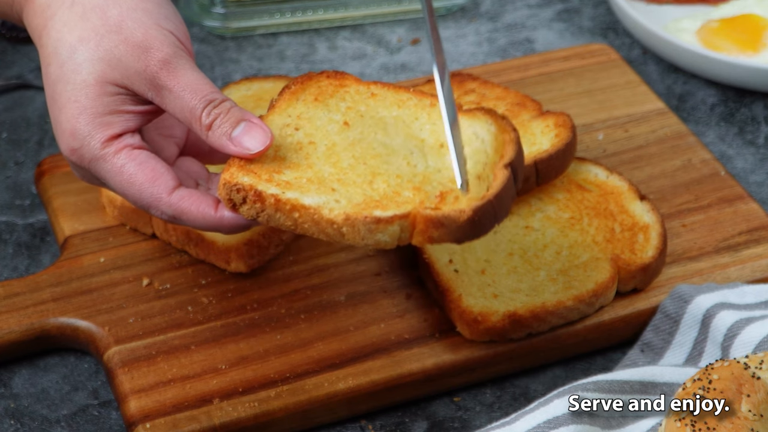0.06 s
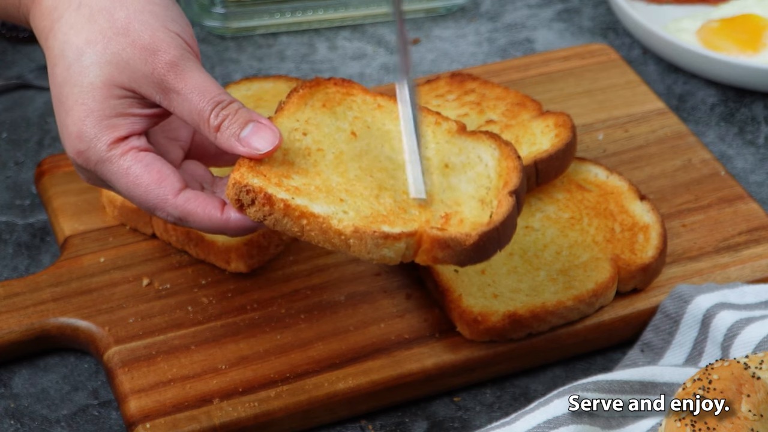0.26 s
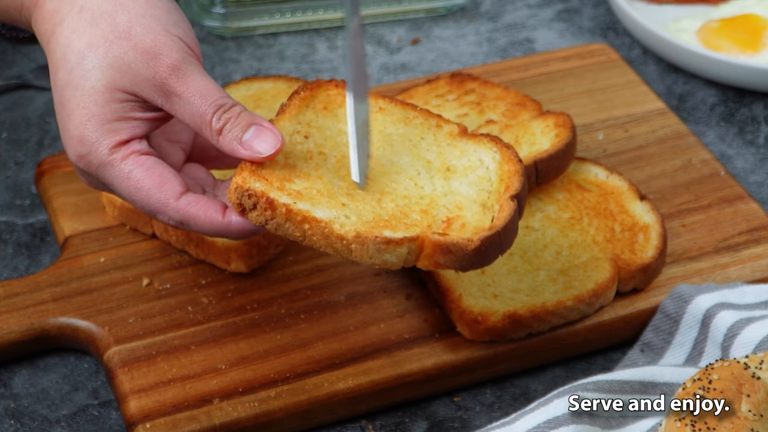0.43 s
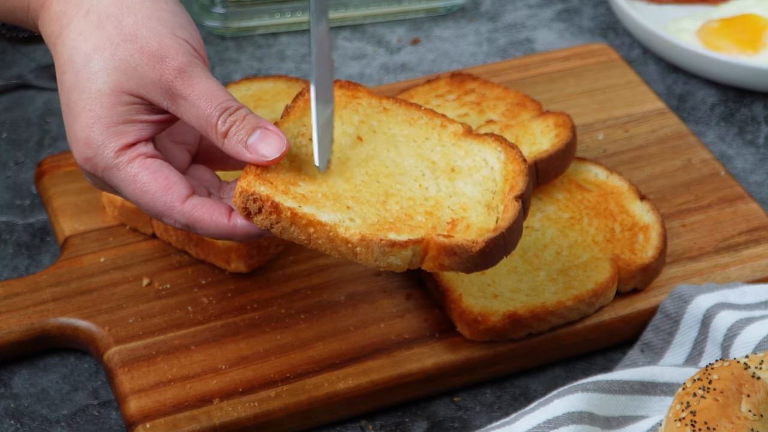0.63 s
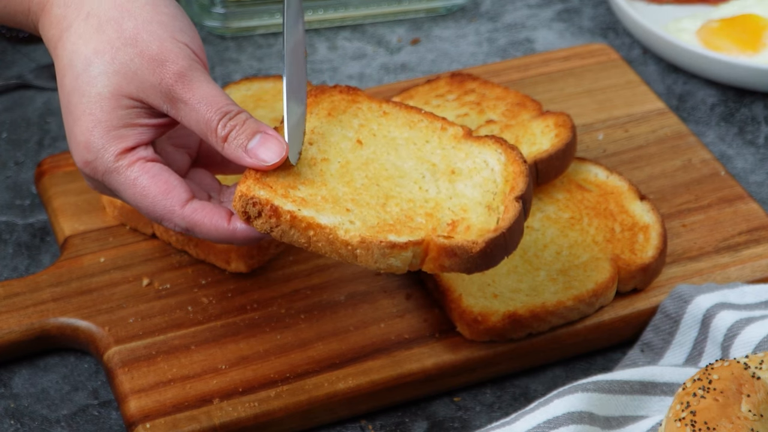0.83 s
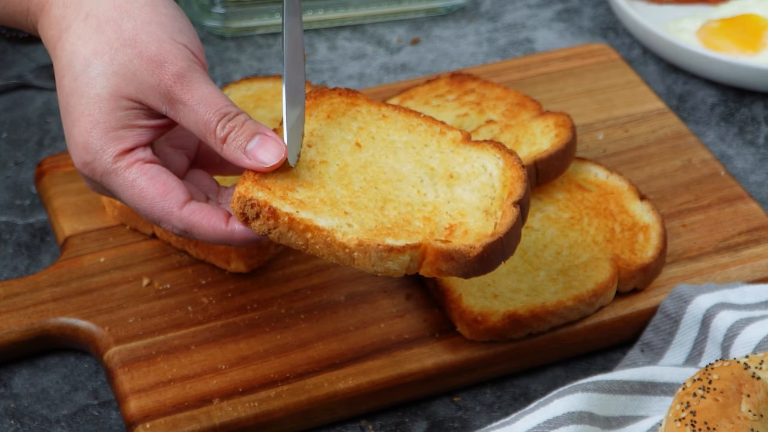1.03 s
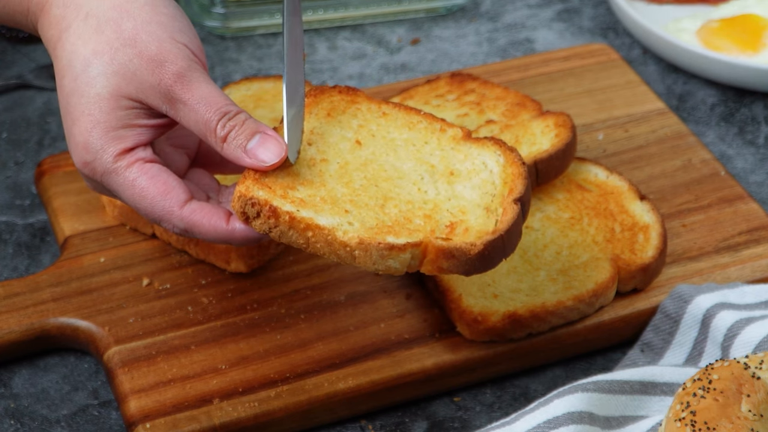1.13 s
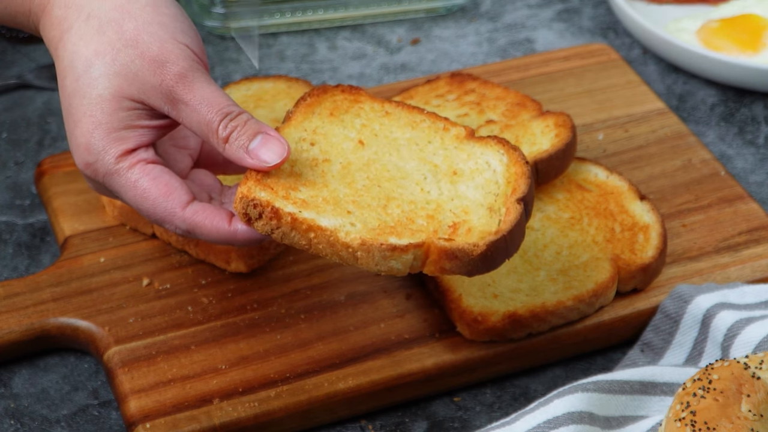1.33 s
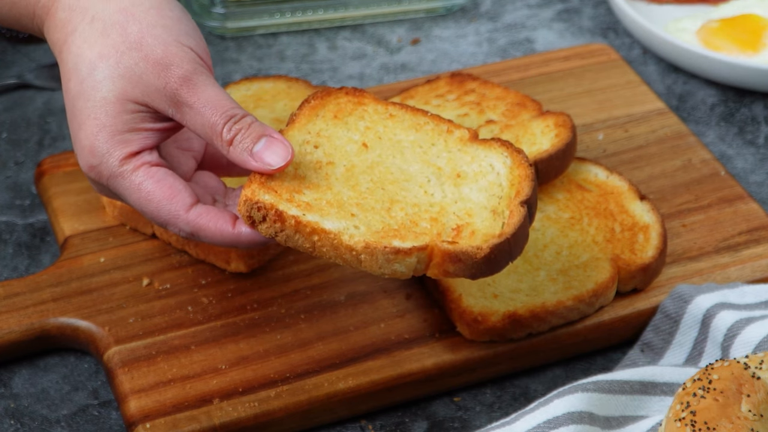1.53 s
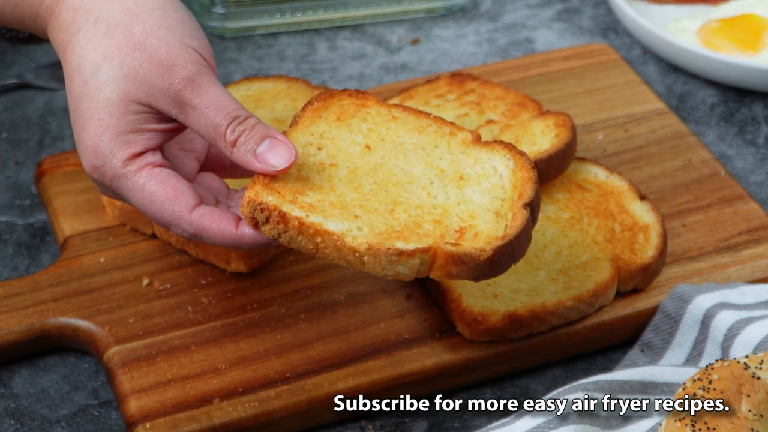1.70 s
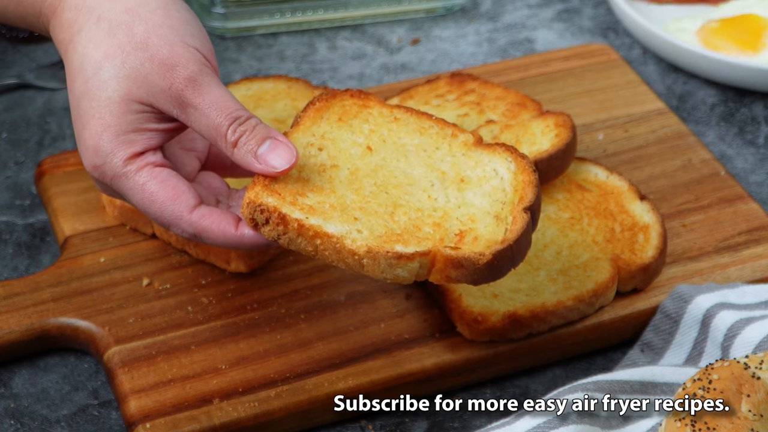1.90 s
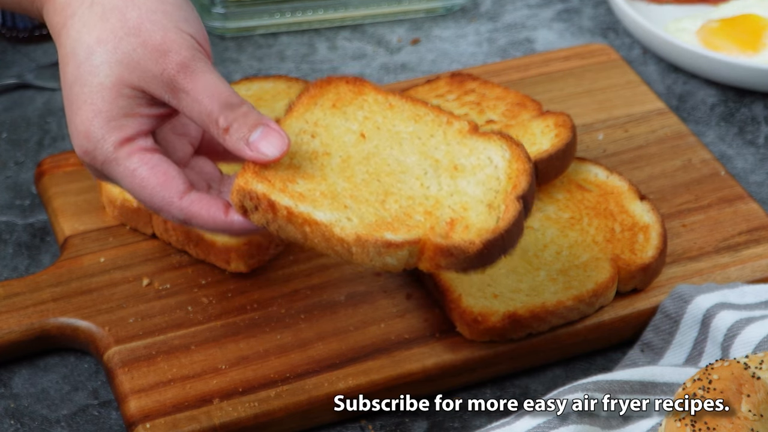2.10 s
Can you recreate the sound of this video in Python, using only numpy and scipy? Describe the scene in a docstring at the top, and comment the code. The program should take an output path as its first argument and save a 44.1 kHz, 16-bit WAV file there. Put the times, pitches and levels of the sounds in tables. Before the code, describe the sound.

A knife scrapes across crisp toast close to the microphone, starting at about 0.15 seconds. Crumbs crackle dryly and the slice knocks with a slight low rumble, fullest and hollowest near 0.4 seconds. The scrape thins, and the blade rings briefly off the crust around 0.8 seconds, stopping by 0.9. A soft, short graze follows at about 1.2 seconds, then only faint kitchen hiss remains.

```python
"""A quiet kitchen hisses faintly. At 0.14 s a table knife starts across a slice of crisp toast, held in
the hand close to the microphone. Crumbs snap and knock the hollow slice, which shudders and, near
0.4 s, booms briefly. Toward the crust the sound thins, and the blade springs free and rings.
The stroke ends before 0.9 s; at about 1.2 s the blade grazes the crust lightly."""
import sys
import numpy as np
from scipy import signal
from scipy.fft import rfft, irfft
from scipy.io import wavfile
from scipy.ndimage import uniform_filter1d

SR = 44100
rng = np.random.default_rng(int(sys.argv[2]) if len(sys.argv) > 2 else 0)


def int16_out(signal):
    """Quantize to a 16-bit WAV file."""
    q = np.round(np.clip(np.atleast_2d(signal).T, -1, 1) * 32767)
    wavfile.write(sys.argv[1], SR, q.astype(np.int16))


N = 94815
TIME_S = np.arange(N) / SR
CLICK_GAIN = np.sqrt(.004 * SR)  # packs the energy of 4 ms of sound into one click


def amp(db):
    """Turns decibels into a number to multiply by."""
    return 10 ** (np.asarray(db) / 20)


def unit(x):
    """Scales a sound to an average power of one."""
    return x / np.sqrt(np.mean(x ** 2) + 1e-20)


def read(points, hz):
    """Looks up a table's value at a pitch, giving each octave equal room."""
    pitches, values = np.transpose(points)
    return np.interp(np.log(hz + 1), np.log(pitches + 1), values)


def level(points, column=1):
    """Loudness over time from a table of decibels; silent before and after it."""
    rows = np.array(points)
    return amp(np.interp(TIME_S, rows[:, 0], rows[:, column], left=-200, right=-200))


def through(x, response):
    """Makes every sample of a sound set off a copy of the response."""
    return signal.fftconvolve(x, response)[:N]


def colour(x, points, size=4096):
    """Gives a sound the balance of low and high pitches in a table."""
    log_gain = np.log(amp(read(points, abs(np.fft.fftfreq(size, 1 / SR)))))
    spectrum = np.exp(np.conj(signal.hilbert(log_gain)))  # nothing sounds ahead of its click
    response = np.fft.ifft(spectrum).real[:size // 2]
    return through(x, response / np.linalg.norm(response))


def ring(x, notes):
    """Each click sets off pure notes that fade by 60 dB in fade_s."""
    t = np.arange(SR // 3) / SR
    tones = sum(amp(db) * unit(amp(-60 * t / fade_s) * np.sin(2 * np.pi * hz * t))
                for hz, db, fade_s in notes)
    return through(x, tones / np.sqrt(len(t)))


def room_hiss():
    """Steady hiss with a faint electrical whine. Gives the centre sound and the side sound (width)."""
    # Tone of the hiss: pitch_hz, level_db
    hiss_tone = [(12, -47), (20, -0.5), (49, -1.5), (145, -0.5), (317, -2.5), (419, -2), (469, -4),
                 (539, -4.5), (713, -5), (1950, -8), (2570, -9), (5950, -9.5), (15800, -11)]
    # Side level compared with the centre: pitch_hz, level_db
    width = [(60, -18), (180, -14), (550, -9), (1650, -6.5), (4970, -1.5), (15000, 1)]
    hz = np.fft.rfftfreq(N, 1 / SR)
    gain = amp(read(hiss_tone, hz))
    centre = irfft(rfft(rng.standard_normal(N)) * gain, N)
    side = irfft(rfft(rng.standard_normal(N)) * gain * amp(read(width, hz)), N)
    scale = amp(-68) / centre.std()
    whine = amp(-87) * unit(np.sin(2 * np.pi * 2001 * TIME_S))
    return scale * centre + whine, scale * side


def grit(breaks_per_s=2200, spread_db=4.8, clump_db=2.5, clump_s=.002):
    """The toast breaks in tiny clicks of uneven size, louder in clumps."""
    size = amp(spread_db * np.minimum(rng.exponential(1, N), 4)) * rng.choice([-1, 1], N)
    clumps = unit(uniform_filter1d(rng.standard_normal(N), int(clump_s * SR)))
    breaks = rng.random(N) < breaks_per_s / SR
    return unit(size * breaks * amp(clump_db * np.clip(clumps, -2, 2)))


def shudder(grains):
    """The grit shakes the slice in the hand, making a low rumble."""
    # Strength of the shaking: time_s, level_db
    shaking = [(.14, -80), (.18, -56), (.215, -61), (.248, -61), (.28, -46.5), (.38, -51.5), (.46, -55),
               (.54, -61.5), (.58, -64), (.65, -68), (.72, -79), (.755, -62), (.85, -80), (.88, -87)]
    # Tone of the bending slice: pitch_hz, level_db
    bending = [(25, -45), (42, -42), (58, -18), (85, -3), (130, 0), (165, 0), (210, -5), (260, -20),
               (500, -50)]
    return amp(-.5) * colour(grains * level(shaking), bending, size=16384)


def crumb_snaps(splinters=12, splinter_s=.0014, splinter_db=-12.5):
    """Each crumb breaks with a sharp click and a few splinters, and knocks the slice once."""
    # The larger crumbs: start_s, crack_db, knock_db
    crumbs = [(0.1426, -48.5, -35), (0.1586, -55, -43), (0.1895, -46, -45), (0.193, -45, -45),
              (0.2096, -59, -35.5), (0.2186, -42, -32.5), (0.222, -41.5, -33.5), (0.2325, -52, -50),
              (0.241, -45, -54), (0.255, -34, -32.5), (0.2581, -52, -37.5), (0.269, -38, -31),
              (0.2718, -31, -33.5), (0.2762, -33, -45), (0.283, -24, -43), (0.2955, -25.5, -26),
              (0.2987, -33.5, -26.5), (0.3036, -31, -33), (0.3301, -35, -34), (0.3314, -26, -25.5),
              (0.34, -28, -30), (0.343, -33.5, -34.5), (0.3543, -29.5, -32), (0.3545, -53, -32),
              (0.365, -28.5, -29), (0.365, -27.5, -36.5), (0.376, -46, -28), (0.3779, -55, -26.5),
              (0.3846, -33.5, -25.5), (0.3935, -35, -37.5), (0.3973, -39.5, -60), (0.4085, -33.5, -26),
              (0.412, -33, -38.5), (0.4448, -34, -30.5), (0.4514, -42, -28), (0.4664, -35, -31),
              (0.4754, -54, -46), (0.4875, -44.5, -43), (0.4992, -63, -34.5), (0.5211, -45, -33.5),
              (0.5252, -40.5, -36.5), (0.5574, -37.5, -42.5), (0.587, -32.5, -42.5), (0.5965, -39.5, -42.5),
              (0.6036, -38.5, -38), (0.624, -40, -52), (0.6398, -41, -46), (0.646, -34, -61),
              (0.6513, -38, -62), (0.656, -36.5, -42), (0.661, -36.5, -49), (0.6838, -40, -47),
              (0.713, -38, -60), (0.7205, -34, -65), (0.7237, -30.5, -41.5), (0.7366, -32, -46),
              (0.757, -29.5, -40), (0.76, -28, -51), (0.766, -30, -50), (0.773, -25.5, -41),
              (0.7771, -28, -38.5), (0.7856, -42, -42), (0.8125, -33.5, -50), (0.8214, -31.5, -41),
              (0.8467, -50, -70), (0.8542, -35, -47.5), (1.196, -57, -73), (1.2052, -52.5, -65),
              (1.2118, -48, -78), (1.2182, -48.5, -66), (1.2227, -51, -71), (1.235, -40.5, -56),
              (1.2379, -57, -64), (1.2449, -43, -77), (1.256, -42.5, -50), (1.2626, -53.5, -63)]
    cracks, knocks = np.zeros((2, N))
    for start_s, crack_db, knock_db in crumbs:
        when, strength = rng.random((2, splinters))
        offsets_s = np.append(0, splinter_s * (2 * when - .5))  # the main click is listed first
        at = ((start_s + offsets_s) * SR).astype(int)
        size = np.append(1, amp(splinter_db) * (4 * strength - 2))
        np.add.at(cracks, at, size / np.linalg.norm(size) * amp(crack_db))
        knocks[at[0]] += amp(knock_db)
    return CLICK_GAIN * cracks, CLICK_GAIN * knocks


def slice_echoes(x, echo_db, places=12, fade_s=.014):
    """Very short echoes inside the slice change as the blade travels."""
    t, echoes = np.arange(SR // 20) / SR, np.zeros(N)
    place = np.arange(N) // (SR // 200) % places  # moves on every 5 ms
    for k in range(places):
        tail = rng.standard_normal(len(t)) * amp(-60 * t / fade_s)
        echoes += through(x * (place == k), tail / np.linalg.norm(tail))
    return (x + amp(echo_db) * echoes) / np.hypot(1, amp(echo_db))


def hollow_slice(knocks):
    """The slice answers each knock: thinly at its rim, fully near its middle, booming at the centre."""
    # Tone of a knock at the rim, middle and very centre: pitch_hz, level_db
    rim_tone = [(150, -69), (290, -26.5), (390, -6), (490, -6), (620, -7.5), (790, -14), (900, -3),
                (1090, -2), (1350, -5.5), (1800, -15.5), (2300, -14), (5000, -49.5)]
    middle_tone = [(150, -48), (260, -15), (350, -6), (480, 1), (620, -3.5), (790, -8.5), (920, 3),
                   (1120, 1.5), (1400, -3.5), (1900, -5.5), (2500, -18), (5000, -48.5)]
    boom_tone = [(200, -37), (350, -4.5), (470, 11.5), (600, 11), (760, -36), (1500, -41)]
    # Low notes of knife and slice: pitch_hz, level_db, fade_s
    low_notes = [(482, -4, .12), (906, 0, .15), (1003, 0, .15), (1110, 0, .12), (1237, -5, .12),
                 (1676, -4, .14)]
    near_middle = np.exp(-((TIME_S - .42) / .22) ** 2)
    near_centre = np.exp(-((TIME_S - .4114) / .032) ** 2)
    rim = colour(knocks * (1 - near_middle), rim_tone)
    middle = colour(knocks * near_middle, middle_tone)
    boom = amp(-3) * colour(knocks * near_centre, boom_tone)
    return rim + middle + boom + amp(-15) * ring(knocks, low_notes)


def blade_ring(face_cracks, crust_cracks):
    """The steel rings under the crackle, and sings out where it springs off the crust."""
    # The blade's notes, one entry each: pitch, level pressed on the toast, level when free, fade time
    pitch_hz = [2448, 3745, 4695, 6662, 7704, 8372, 10324, 11645, 12825, 14625, 15246]
    pressed_db = [-17, -20, -26, -10, -11, -14, -17, -17, -22, -11, -13]
    free_db = [-17, -30, 0, -13, -17, -16, -22, -20, -23, -21, -24]
    fade_s = [.12, .09, .105, .09, .07, .075, .11, .08, .06, .06, .065]
    # The blade springs off ridges of crust: start_s, level_db
    ridges = [(.7244, -49), (.7768, -28.5), (.8217, -34.5), (1.2345, -58), (1.2457, -45), (1.2622, -41.5)]
    flicks = np.zeros(N)
    for start_s, level_db in ridges:
        flicks[int(start_s * SR)] = amp(level_db) * CLICK_GAIN
    pressed = ring(face_cracks, zip(pitch_hz, pressed_db, fade_s))
    free = ring(flicks + amp(-11.5) * crust_cracks, zip(pitch_hz, free_db, fade_s))
    return pressed + free


def knife_scrape():
    """Breaking toast crackles, knocks the slice and rings the blade. Gives the toast and the steel."""
    # Fine grit in the long stroke, then in the light graze: time_s, crack_db, knock_db
    stroke = [(.14, -58, -85), (.15, -51, -48), (.2, -49.5, -48.5), (.249, -48.5, -44), (.258, -41, -43),
              (.28, -47, -32), (.305, -43, -41), (.32, -43.5, -44.5), (.345, -46, -35.5), (.41, -36.5, -42),
              (.44, -50, -39.5), (.49, -43, -39), (.52, -46.5, -39.5), (.578, -47, -50), (.61, -45, -50),
              (.65, -44.5, -48.5), (.705, -47, -55), (.745, -44.5, -50), (.775, -37, -43), (.8, -44.5, -66),
              (.825, -38, -37.5), (.843, -75, -85), (.856, -41, -63), (.868, -85, -85)]
    graze = [(1.165, -78, -74), (1.192, -64, -82), (1.205, -51.5, -64), (1.235, -53, -64.5),
             (1.26, -55, -66), (1.275, -62, -68), (1.29, -88, -91)]
    # Tone of the crackle on the face, on the crust and in the graze: pitch_hz, level_db
    face_tone = [(700, -36.5), (1700, 4), (2400, 2), (3500, 0), (5000, 1.5), (6500, 0), (8300, 1),
                 (9000, -5), (12000, -6), (13800, -6), (14700, -1), (15800, -17)]
    crust_tone = [(700, -48), (2000, -6), (2550, 2.5), (3300, 2), (4000, -0.5), (5200, 4), (6500, -1.5),
                  (8000, -2.5), (9000, -5.5), (11500, -8.5), (13600, -10), (14800, -19), (15800, -2.5)]
    graze_tone = [(700, -17.5), (1900, -14), (2300, -6.5), (2550, 2), (3300, 2), (4100, -2.5), (5200, -4),
                  (6800, -0.5), (8000, -2), (9000, -8.5), (10500, -1.5), (12500, -9), (14500, -8),
                  (15800, -12)]
    cracks, knocks = crumb_snaps()
    grains = grit()
    cracks += grains * (level(stroke) + level(graze))
    knocks += grains * (level(stroke, column=2) + level(graze, column=2))
    cracks = amp(-2.5) * slice_echoes(cracks, echo_db=-8)
    knocks = amp(-4.5) * slice_echoes(knocks, echo_db=-10)
    crust_share = np.interp(TIME_S, [.22, .73], [0, 1])
    lift_s = 1  # by now the blade has left the slice
    face = cracks * (1 - crust_share)
    crust = cracks * crust_share * (TIME_S < lift_s)
    grazed = cracks * (TIME_S >= lift_s)
    crackle = colour(face, face_tone) + colour(crust, crust_tone) + colour(grazed, graze_tone)
    return crackle + hollow_slice(knocks) + shudder(grains), blade_ring(face, crust + grazed)


def kitchen_echo(x):
    """The room gives a short echo whose highest pitches die first."""
    # Time the echo takes to fall by 60 dB: pitch_hz, fade_s
    fade_times = [(100, 0.18), (700, 0.21), (2000, 0.15), (5000, 0.21), (15000, 0.047)]
    hz, t, noise = signal.stft(rng.standard_normal(SR // 2), SR, nperseg=256)
    fade = amp(-60 * t / read(fade_times, hz)[:, None])
    rise = np.minimum(t / .002, 1)
    tail = signal.istft(noise * fade * rise, SR)[1]
    return through(x, tail / np.linalg.norm(tail))


def scene():
    """The scrape sits dead centre; only the room hiss has width."""
    toast, steel = knife_scrape()
    hiss, side = room_hiss()
    # The blade's ring gets less room echo than the toast, so it stays dry and short
    echo = amp(-9.5) * kitchen_echo(toast + .4 * steel)
    centre = toast + steel + echo + hiss
    return np.array([centre + side, centre - side])


def record(dry):
    """Cuts away the very highest pitches, above 15850 Hz."""
    treble_cut = signal.firwin(511, 15850, window=("kaiser", 8), fs=SR)
    return signal.oaconvolve(dry, treble_cut[None], "same")


dry = scene()
out = record(dry)
int16_out(out)
```